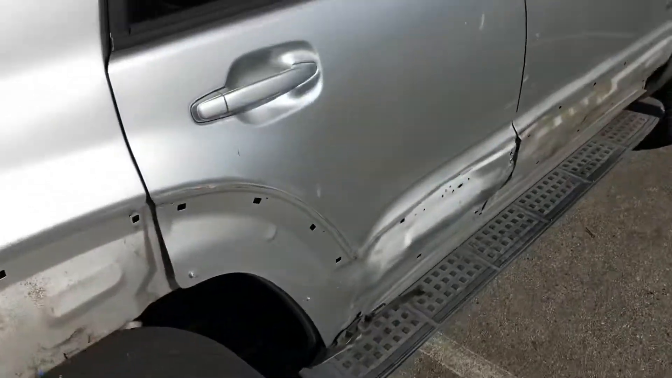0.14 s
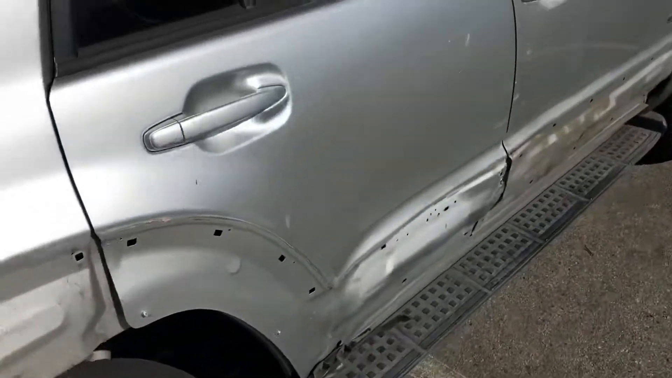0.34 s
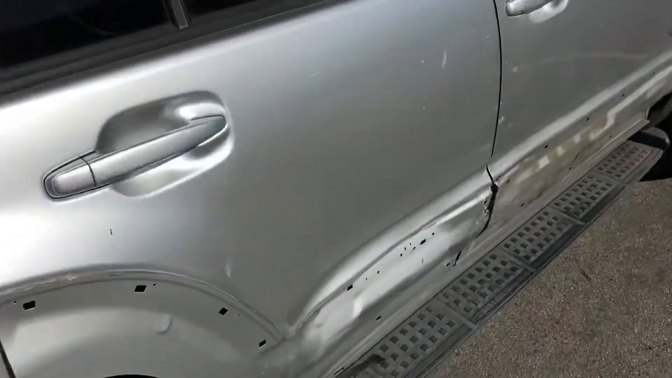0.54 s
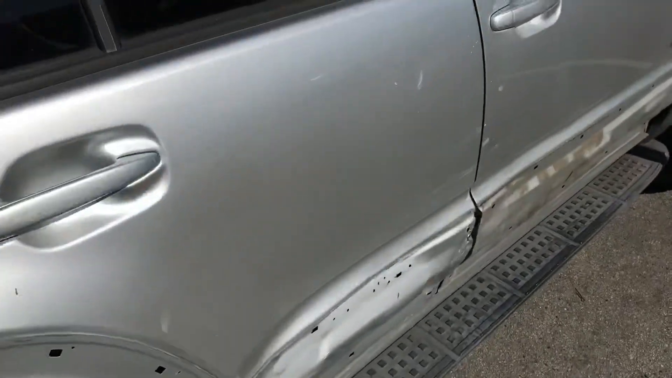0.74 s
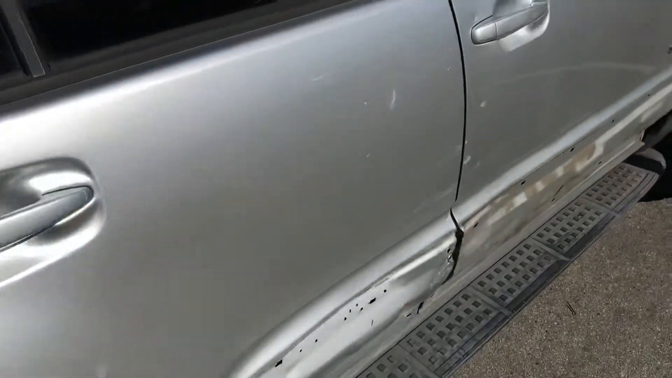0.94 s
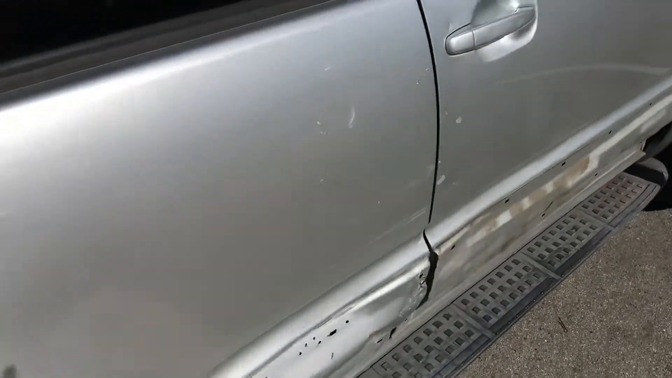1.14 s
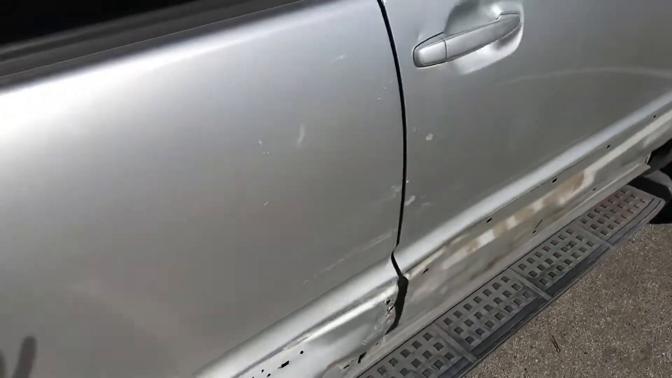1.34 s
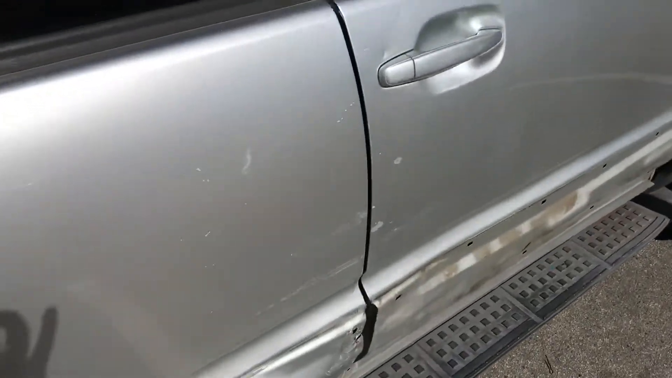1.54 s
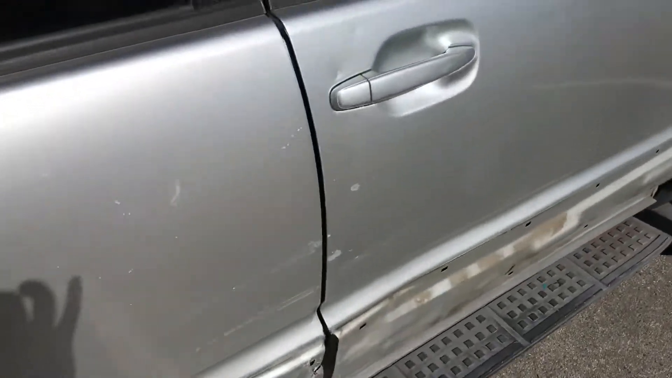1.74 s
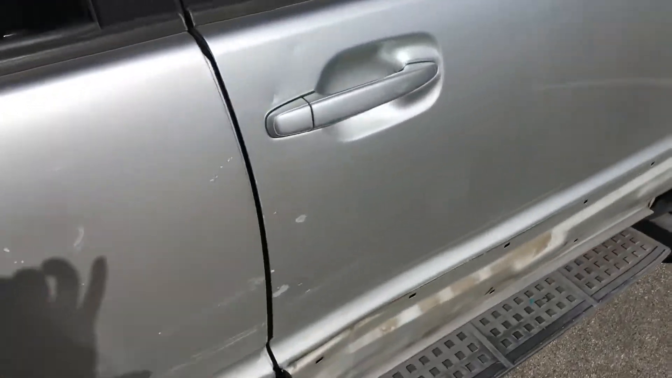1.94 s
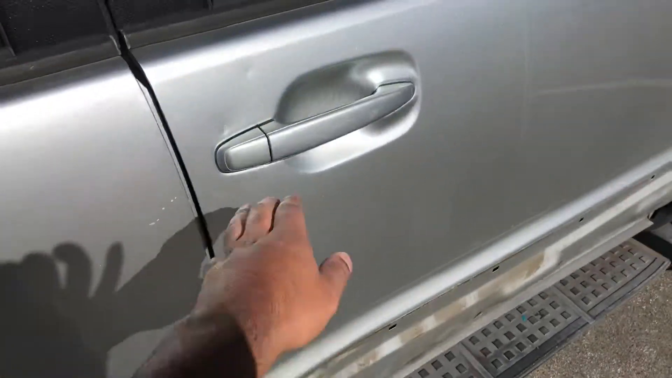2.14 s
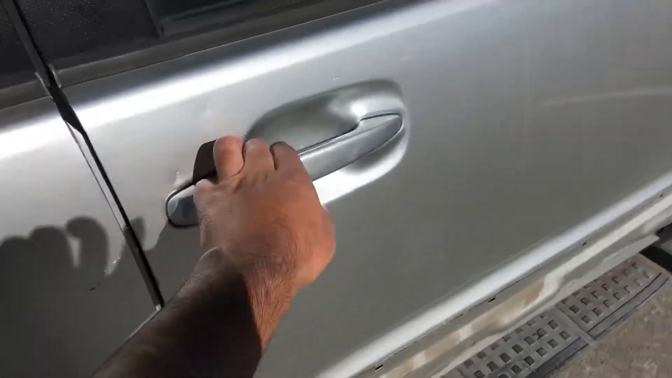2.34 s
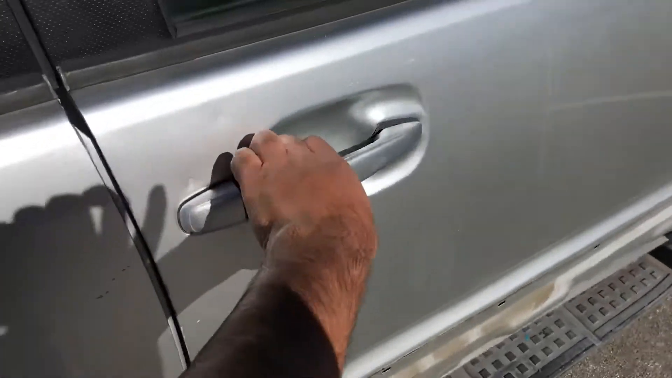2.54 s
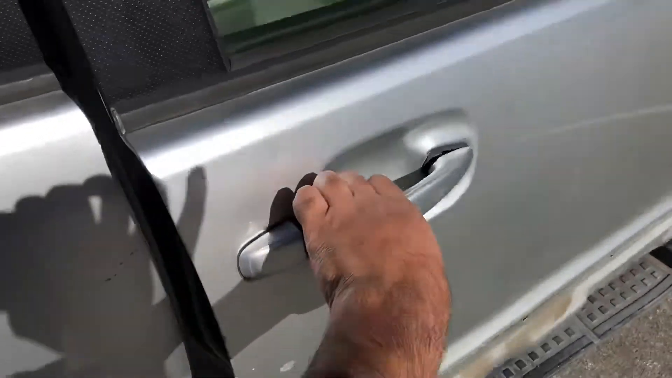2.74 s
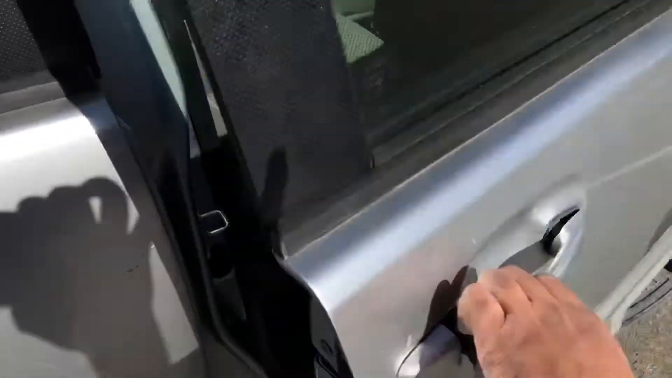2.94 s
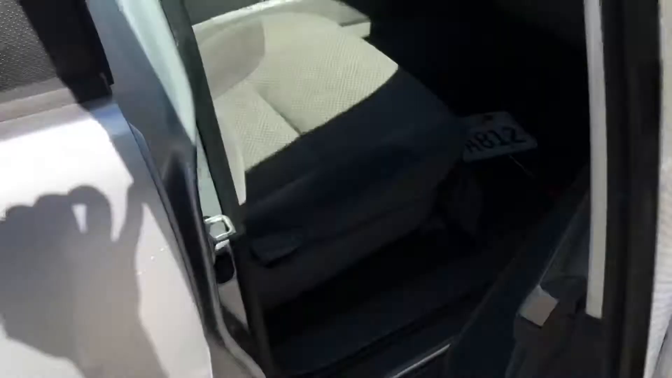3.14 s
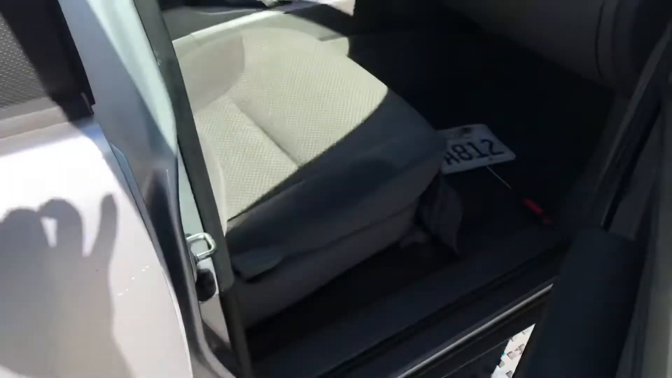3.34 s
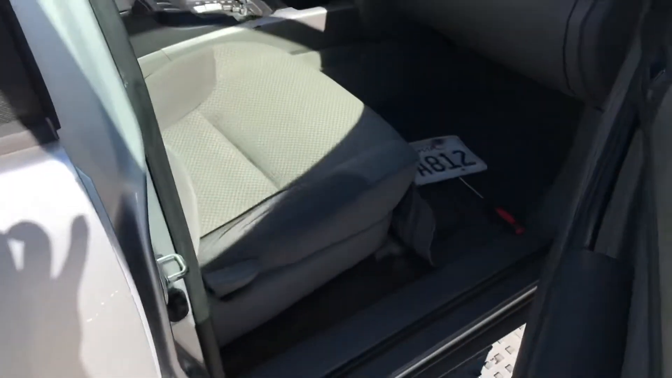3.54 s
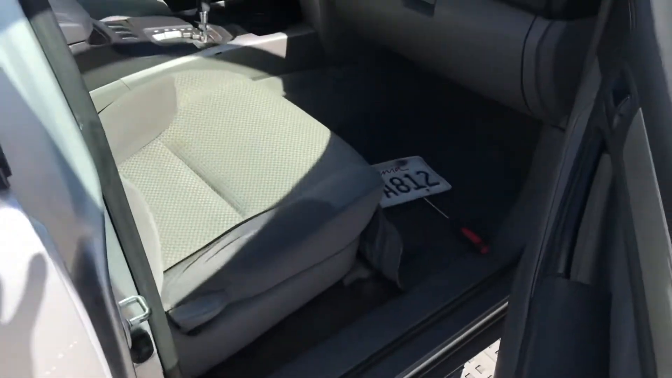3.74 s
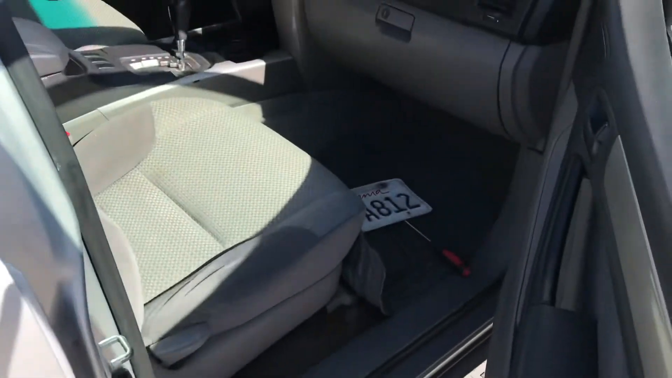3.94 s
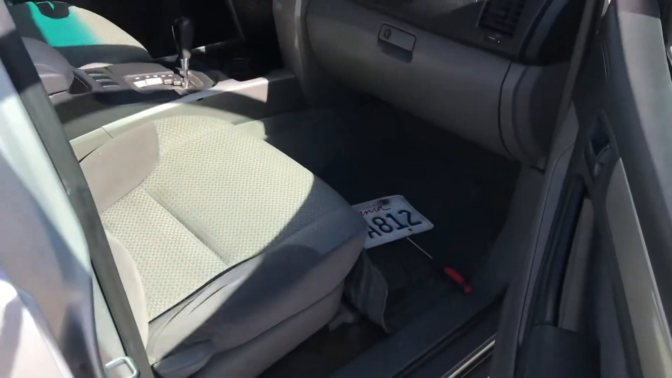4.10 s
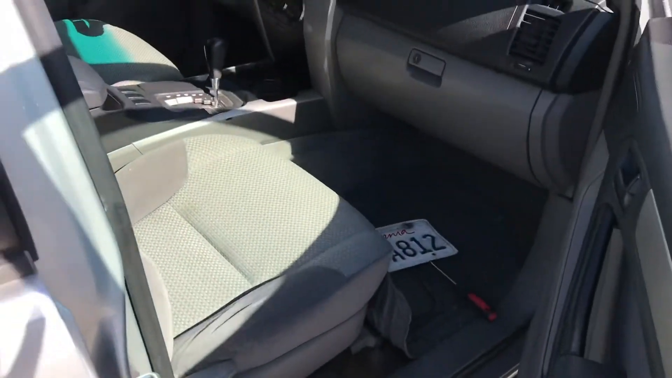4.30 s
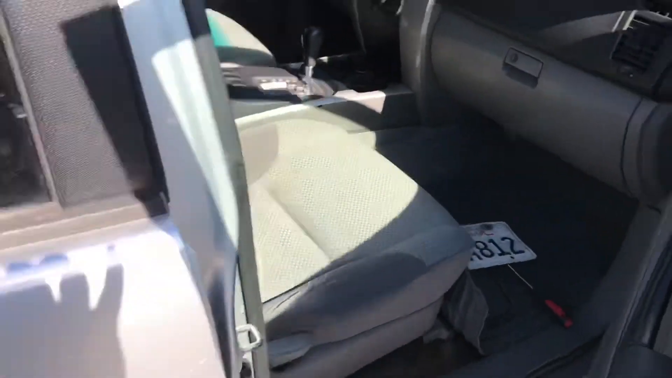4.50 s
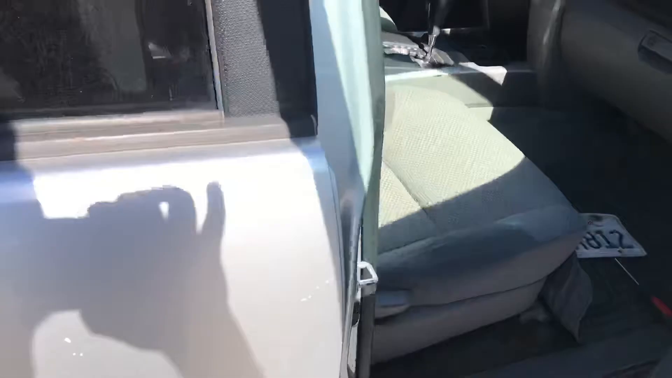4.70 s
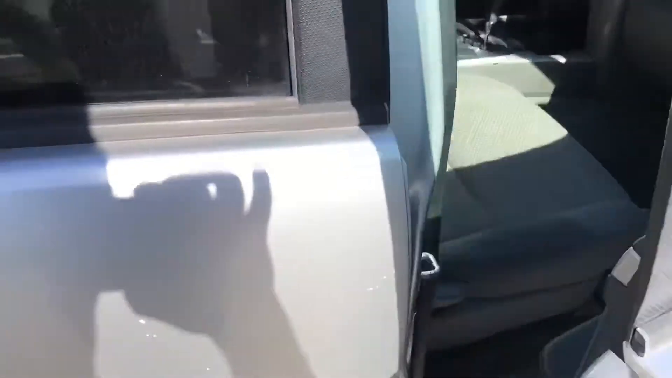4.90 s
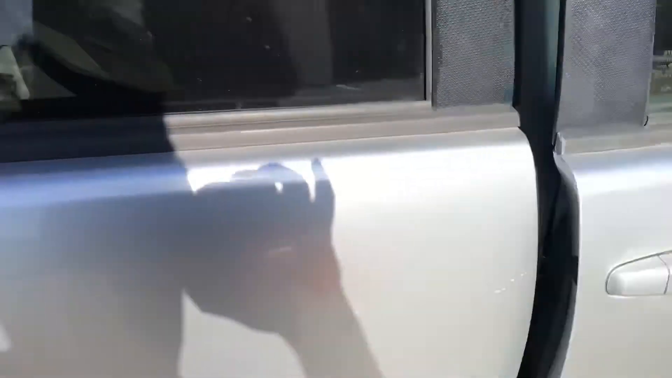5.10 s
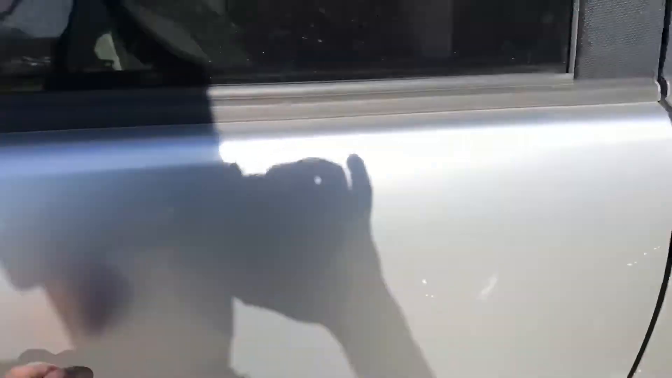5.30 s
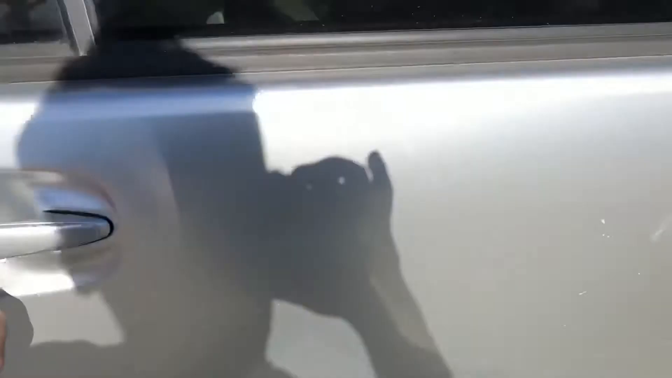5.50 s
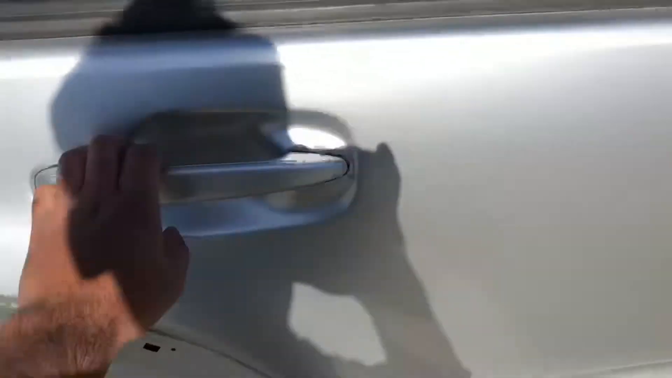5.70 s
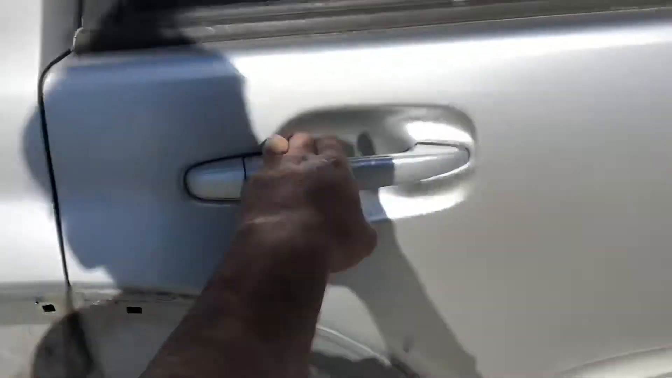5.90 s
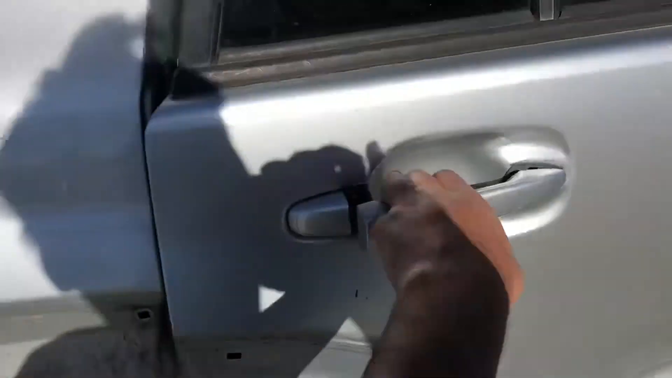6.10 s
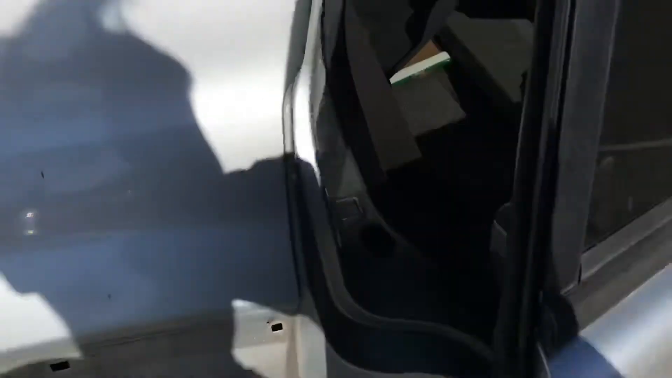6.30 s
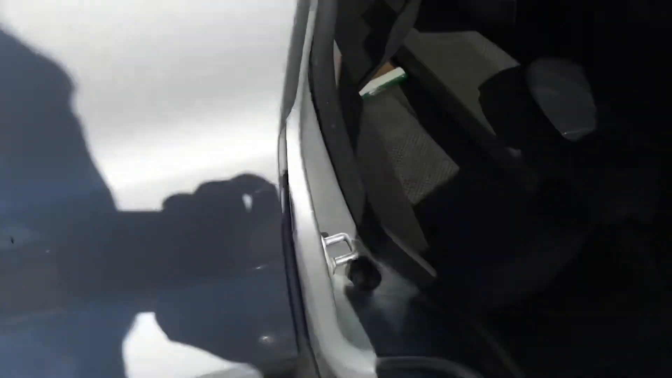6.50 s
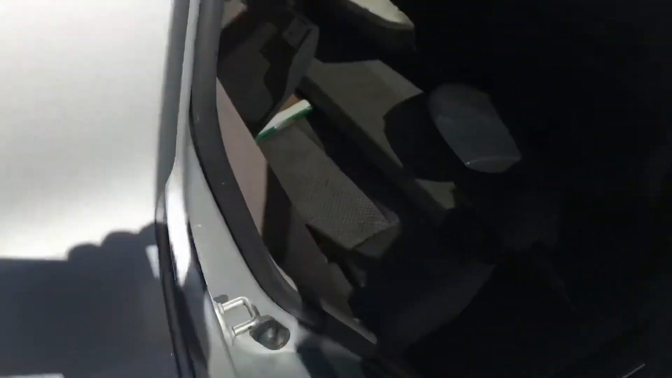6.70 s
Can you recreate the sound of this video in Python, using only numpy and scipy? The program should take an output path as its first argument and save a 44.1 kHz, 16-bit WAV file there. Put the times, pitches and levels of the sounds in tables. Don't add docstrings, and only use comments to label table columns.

```python
import sys
import numpy as np
from scipy import signal
from scipy.fft import rfft, irfft, next_fast_len
from scipy.io import wavfile
from scipy.ndimage import uniform_filter1d, map_coordinates

SR = 44100
rng = np.random.default_rng(int(sys.argv[2]) if len(sys.argv) > 2 else 0)


def invert_db(level):
    return 10 ** (np.asarray(level, dtype=float) / 20)


def master(y):
    cut = np.clip(np.atleast_2d(y).T, -1, 1)
    pcm = np.round(cut * 32767)
    wavfile.write(sys.argv[1], SR, pcm.astype(np.int16))


N = 297675

# start_s, level_db
TRAFFIC_NEARNESS = [(0, 1.5), (.6, 1.5), (1.5, .5), (1.9, -.5), (2.29, -1), (3.42, -2.5), (4.34, -2.5),
                    (4.83, -1), (5.15, -1), (5.5, 1.5), (5.7, 2), (5.9, 1), (6.17, 1), (6.39, -2.5),
                    (6.75, -0.5)]
# start_s, level_db
STIRRED_AIR = [(0, -1.5), (.6, -1.5), (2.29, -2), (2.71, 11), (2.8, 5.5), (3.16, 3), (3.42, 1), (4.34, 0.5),
               (4.83, 2), (5.13, 1.5), (5.45, 6), (5.7, 4), (5.96, 7), (6.17, 1.5), (6.39, 5.5), (6.64, 4),
               (6.75, 2)]
# pitch_hz, level_db (per Hz)
RUMBLE_COLOUR = [(12, -59), (20, -7), (36, -13), (49, 3.5), (97, 0.5), (119, -4), (135, -2), (180, -42),
                 (300, -120)]
DRONE_COLOUR = [(79, -36), (135, -1), (279, -3), (322, -6.5), (357, -11), (388, -11), (420, -13),
                (480, -17), (620, -18), (1060, -120)]
ROAD_COLOUR = [(240, -57), (400, 5), (422, -6), (515, -10.5), (650, 3), (754, 4), (821, 3), (903, 3.5),
               (1160, 4.5), (1510, 1), (1650, -1), (2360, -6.5), (2740, -7), (3570, -7.5), (5000, -31),
               (6500, -54), (11000, -120)]
AIR_COLOUR = [(2350, -21), (4000, -0.5), (4460, -2.5), (5070, -7), (6460, -4.5), (7770, -10.5),
              (8720, -6.5), (10400, -13.5), (11300, -10.5), (14700, -12), (15900, -13)]
# pitch_hz, width_hz, level_db
MACHINERY = [(61, 5.5, -6.5), (363.5, 9, -10), (660, 10.4, -17), (1143.4, 29, -13.5), (1300, 59, -21)]
# start_s, pitch_hz, level_db
IDLING_ENGINE = [(0, 60.6, -48), (.45, 57.2, -50), (.6, 57.4, -58), (.8, 58.8, -53), (.92, 59.5, -67),
                 (1.05, 58.8, -55), (1.35, 52.3, -53)]
# start_s, pitch_hz, level_db
LEAVING_ENGINE = [(1.45, 52, -54), (1.7, 73.1, -53), (1.85, 90.4, -53), (2, 95, -54), (2.1, 98, -58)]

# pitch_hz, level_db (per Hz)
RASP_COLOUR = [(1100, -12), (1900, 4), (3000, 4.5), (4500, 4), (7000, -5.5), (9500, -47)]
FIZZ_COLOUR = [(5000, -3), (7500, 2), (10500, -1.5), (13000, -1), (15800, -6)]
# start_s, length_s, first_db, last_db, fizz_minus_rasp_db
SKIN_SLIDES = [(2.061, 0.054, -57, -55.5, -2.5), (2.534, 0.079, -48, -53.5, -4.5),
               (2.612, 0.037, -47, -51.5, -1.5), (2.845, 0.13, -58, -59.5, -10), (3.53, 0.4, -69.5, -78, 2),
               (6.435, 0.062, -57.5, -34.5, -6), (6.664, 0.11, -51.5, -56.5, -1.5),
               (6.395, 0.037, -64, -56, -7), (6.51, 0.038, -43, -46, -6), (6.57, 0.1, -74, -54, -1.5),
               (5.276, 0.026, -32, -34, -17), (5.3, 0.028, -39, -55, -13), (5.92, 0.03, -72, -74, 7),
               (3.02, .1, -60, -56, -6), (3.145, .04, -62, -60, -2), (2.37, .07, -62, -66, -12),
               (4.89, .06, -56, -66, -12), (5.51, .06, -60, -64, -4), (5.65, .05, -63, -65, -2)]
# start_s, length_s, first_db, last_db, fizz_minus_rasp_db
SEAL_PEELS = [
    (3.01, 0.2, -58, -66.5, -6.5),
    (4.94, .14, -71, -62, -1),
    (5.06, 0.2, -64.5, -66, -20),
    (6.005, 0.077, -59.5, -36, -5),
    (6.072, 0.11, -55.5, -44, -8),
    (6.3, 0.3, -65, -56, -1.5),
]

# start_s, click_db, centre_hz
PLASTIC_TICKS = [(1.478, -48.5, 1720), (2.0954, -39, 2220), (2.3065, -43.5, 4040), (2.4932, -36, 2740),
                 (2.608, -45, 7020), (2.462, -55, 3000), (2.6588, -35, 2340), (2.734, -53, 3100),
                 (3.0854, -41, 1300), (3.108, -48, 4380), (3.17, -54, 4400), (4.835, -57, 5670),
                 (4.892, -44, 3320), (5.242, -31.5, 2380), (5.296, -27.5, 3980), (5.3084, -38, 4500),
                 (5.5567, -46, 4070), (5.9035, -48, 7000), (5.917, -49, 2300), (6.094, -32, 2510),
                 (6.111, -38, 4960), (6.1194, -49, 3140), (6.147, -33, 3420), (6.403, -50, 2980),
                 (6.7054, -46, 6280)]
# start_s, click_db, centre_hz, sheen_minus_click_db
STEEL_CLINKS = [(0.5662, -43.5, 1800, 4), (1.592, -50, 3630, 10), (2.3213, -43, 3200, 4),
                (2.3318, -42, 4230, 6), (2.362, -48, 3980, 6), (2.389, -51, 5000, 4),
                (2.4877, -38.5, 2460, 3), (5.5214, -48, 2410, 9), (5.536, -47, 2390, 12.5),
                (5.66, -44, 5500, 0), (5.682, -52, 3170, 13), (5.87, -52, 6500, 9),
                (6.4208, -39.5, 3440, -2), (6.4697, -32.5, 4610, -1), (6.533, -29.5, 4000, 7),
                (6.559, -31.5, 7000, -3), (6.689, -33.5, 3800, -6), (4.888, -54, 4000, 3),
                (5.8925, -53, 6500, 0), (5.914, -48, 6000, 2), (5.797, -57, 7000, 0), (6.403, -55, 5000, 6),
                (6.123, -41, 6500, -2), (6.096, -34, 5500, 0)]
# start_s, click_db, centre_hz, sheen_minus_click_db, t60_s (time to fall 60 dB)
PAWL_CLICKS = [(2.546, -38.5, 4330, 9, 0.044), (2.574, -33, 3450, 5, 0.064), (2.611, -41, 5000, 5, 0.072),
               (2.68, -32.5, 2620, -1.5, 0.038), (2.748, -31.5, 2700, -27, 0.049),
               (5.2604, -24, 3400, -19, 0.14), (5.285, -27, 4200, -19, 0.05), (5.342, -45, 3500, 2, 0.057),
               (6.031, -33, 3000, 9, 0.022), (6.047, -32, 3600, -12, 0.027)]

# pitch_hz, width_hz, level_db
HANDLE_TONES = [(513, 480, -2), (868, 360, 0), (1147, 220, -1), (1590, 277, -3), (1950, 650, -9)]
# pitch_hz, level_db
PANEL_TONES = [(205, -1), (258, 1.5), (300, 0.5), (345, 1.5), (385, -8), (440, -4.5)]
# start_s, rap_db, rap_centre_hz, knock_db
FINGER_TAPS = [
    (2.3075, -32, 668, -39),
    (2.3318, -31.5, 600, -30),
    (2.3632, -30, 905, -36),
]
# start_s, rap_db, rap_centre_hz, knock_db
DAMPED_RAPS = [(2.492, -19.5, 605, -35), (2.574, -25, 633, -33), (2.68, -28, 795, -20.5),
               (2.749, -27.5, 1870, -53), (2.888, -43, 452, -30.5), (2.927, -45, 571, -38),
               (3.015, -40, 563, -60), (3.085, -35, 900, -38), (5.523, -35.5, 696, -27.5),
               (5.558, -38, 450, -33), (5.908, -52, 452, -35), (6.147, -37, 975, -50),
               (6.445, -52, 657, -52)]
# start_s, rap_db, rap_centre_hz, knock_db
SWINGING_RAPS = [(2.839, -33, 700, -29), (4.886, -25.5, 440, -30), (4.91, -41, 458, -29.5),
                 (5.297, -20, 452, -19), (6.093, -33, 452, -21), (6.328, -35.5, 530, -35),
                 (6.409, -35, 1630, -34), (6.532, -24, 452, -22)]
# start_s, rap_db, rap_centre_hz, knock_db
PAWL_KNOCKS = [
    (5.243, -11.5, 780, -28),
    (5.261, -18, 1090, -16.5),
    (6.031, -19.5, 1550, -26.5),
]

# start_s, peak_db, pitch_hz, cycles
HAND_BUMPS = [(2.196, -34, 78.5, 1.8), (2.843, -36, 169.4, 13), (2.92, -36, 78, 4.6),
              (2.875, -37.5, 249.5, 18), (2.925, -39, 248.6, 16), (2.95, -41, 189, 10),
              (5.849, -51, 382, 20), (5.108, -62.5, 4620, 250), (2.715, -30, 270, 9), (2.84, -38, 370, 16),
              (4.9, -38, 400, 24), (6.105, -27, 335, 22), (6.085, -18, 238, 7), (3.804, -36, 79, 1.8),
              (4.604, -34.5, 62, 5.7), (4.664, -29.5, 106, 1.4), (5.41, -29.5, 56.6, 3.3),
              (5.711, -33.5, 122, 1.7), (5.9, -34, 86.1, 2.8), (5.916, -31, 76.4, 2.2)]
# start_s, peak_db, pitch_hz, cycles
AIR_PUNCHES = [(2.651, -23.5, 147, 6.4), (2.675, -34.5, 868, 32), (2.66, -32, 45, 3), (2.699, -28, 90.5, 3),
               (2.735, -37, 58, 3.2), (5.272, -8, 310, 2.5), (5.273, -13.5, 95, 2.9),
               (5.271, -34, 39.5, 2.7), (5.298, -21, 118, 4.8), (5.3192, -17.5, 63, 2.4),
               (5.369, -29, 102, 3.6), (6.0714, -5.5, 293, 2.74), (6.096, -24.5, 172, 7.5),
               (6.135, -35, 149.6, 7.3), (6.5014, -6, 444, 2.4), (6.51, -19.5, 154, 9.7),
               (6.56, -38, 136, 6)]

# pitch_hz, level_db (per Hz)
PUFF_COLOUR = [(5000, -7), (9000, -10), (12000, -2), (15800, -4)]
# pitch_hz, width_hz, level_db
STRAP_TONES = [(3630, 350, -1.5), (6160, 440, -3), (8650, 580, -5), (11900, 760, -5), (14200, 600, -7)]
# start_s, level_db
STRAP_CHATTER = [(6.668, -30), (6.684, -52), (6.691, -31), (6.704, -31), (6.713, -37), (6.741, -44),
                 (6.747, -27)]

# start_s, crack_db, rap_db, boom_db, rise_s
HEAVY_BLOWS = [
    (2.6517, -33, -22.5, -23.5, 0.004),
    (5.27, -16, -17, -19.5, 0.0016),
    (6.0701, -6, -12.5, -20, 0.012),
    (6.5015, 0.4, -16, -19, 0.014),
]
# pitch_hz, level_db, t60_s
PLATE_TONES = [
    [(635, 5, 0.17), (865, -6, 0.19), (1155, 5, 0.079), (1360, -21, 0.21), (1470, -7, 0.081),
     (1674, -20, 0.16), (1930, -19, 0.1), (2230, -23, 0.14), (2299, -18, 0.14)],
    [(452, 0, 0.13), (511, -21, 0.54), (565, -15, 0.21), (969, -25, 0.24), (1235, -8, 0.12),
     (1437, -20, 0.18), (1486, -8, 0.16), (1680, -26, 0.24), (1800, -26, 0.23), (1980, -29, 0.21),
     (2240, -21, 0.19), (2400, -20, 0.15)],
    [(625, -11, 0.18), (737, 5, 0.11), (873, -1, 0.2), (1010, -14.5, 0.35), (1143, -2, 0.16),
     (1293, -15, 0.3), (1775, 3, 0.11), (1956, -4, 0.044), (2270, -16, 0.13), (2340, -13, 0.099),
     (2450, -22, 0.15), (2520, -23, 0.18)],
    [(630, -12, 0.2), (700, -11, 0.15), (802, -1, 0.16), (1046, -12, 0.16), (1233, -2, 0.076),
     (1320, -17, 0.16), (1491, -8, 0.19), (1750, -5, 0.13), (1940, -16, 0.098), (2143, -10, 0.11),
     (2330, -15, 0.19), (2880, -14, 0.15)],
]
PLATE_LEVELS = [-23, -17, -14, -21]
# pitch_hz, level_db, t60_s
DOOR_TONES = [
    [(91, -19, 0.16), (158.7, -2.5, 0.39), (213.3, -3, 0.35), (246, -5, 0.3), (310, -3, 0.2),
     (371, -3, 0.22), (432, 0, 0.12), (593, -6, 0.1), (851, -12, 0.25)],
    [(60.4, -8, 0.57), (95, -9, 0.56), (130, -13, 0.3), (165, -6.5, 0.37), (251.2, 6.5, 0.16),
     (302.5, -5, 0.22), (353, -3, 0.27), (432, -26, 0.072), (590, -12, 0.084)],
    [(134, -19, 0.26), (176, -13.5, 0.56), (241, 0, 0.12), (332.5, 2, 0.19), (369, 8.5, 0.13),
     (435, 3.5, 0.11), (560, -21, 0.15), (790, -34, .1), (1150, -30, 0.1)],
    [(122, -21, 0.53), (155.4, -2, 0.3), (271, 7.5, 0.06), (322.6, -7, 0.21), (360, -13, 0.19),
     (394.5, 7, 0.11), (465, -6, 0.03), (765, -20, 0.083), (1010, -25, 0.21)],
]
# rattle_minus_crack_db, rattle_stretch (times), rap_stretch (times)
TRIM_SHAKES = [
    (-3.5, 2.3, 1.2),
    (3, 0.72, 0.75),
    (-19, 1.7, 0.68),
    (-11, 1.02, 0.82),
]
# pitch_hz, level_db (per Hz)
CRACK_COLOUR = [(1060, 13), (1800, -8), (2290, -1), (3000, -3.5), (3570, 6), (4070, 1), (6010, 5.5),
                (6710, -2), (8080, -19), (9370, -7), (10100, -19), (14900, -8), (16500, -50)]
# pitch_hz, t60_s
RATTLE_DECAY = [(400, 0.2), (1000, 0.11), (2500, 0.096), (6000, 0.058), (14000, 0.05)]


def unit(x):
    return x / np.sqrt(np.mean(x ** 2) + 1e-20)


def peak(x):
    return x / np.abs(x).max()


def along(points, hz):
    f, db = np.transpose(points)
    return invert_db(np.interp(np.log(hz + 1), np.log(f + 1), db, -120, -120))


def curves(rows):
    s, *columns = np.transpose(rows)
    return [np.interp(np.arange(N) / SR, s, column) for column in columns]


def wobble(rate):
    knots = rng.standard_normal(int(N * rate / SR) + 4)
    return map_coordinates(knots, [np.arange(N) * rate / SR])


def noise(length=N):
    return rng.standard_normal(length)


def filtered(x, response):
    m = next_fast_len(len(x) + 8192)
    return irfft(rfft(x, m) * response(np.fft.rfftfreq(m, 1 / SR)), m)[:len(x)]


def resonances(modes):
    def response(f):
        total = 0
        for k, (centre, width, db) in enumerate(modes):
            total = total + (-1) ** k * invert_db(db) * 1j * f * width / (centre ** 2 - f ** 2 + 1j * f * width)
        return total
    return response


def rush(colour, patchy_db):
    z = signal.stft(noise(N + 512), nperseg=512)[2]
    patches = uniform_filter1d(rng.standard_normal(z.shape), size=6, axis=0)
    patches = uniform_filter1d(patches, size=14, axis=1)
    x = signal.istft(z * invert_db(patchy_db * unit(patches)), nperseg=512)[1][:N]
    return unit(filtered(x, lambda hz: along(colour, hz)))


def burst(response, t60, rise):
    t = np.arange(SR // 4) / SR
    shape = invert_db(-60 * t / max(t60, 1e-3)) * (1 - np.exp(-t / max(rise, 1e-5)))
    return peak(shape * filtered(noise(len(t)), response))


def ring(modes, scatter_db, rise):
    t = np.arange(SR // 2)[:, None] / SR
    hz, db, t60 = np.transpose(modes)
    detune, strength = rng.standard_normal((2, len(hz)))
    pair = np.sin(2 * np.pi * hz * t)
    pair = pair + 0.4 * np.sin(2 * np.pi * hz * (1 + 0.04 * detune) * t)
    dying = invert_db(db + scatter_db * strength - 60 * t / np.clip(t60, 0.03, 0.5))
    return peak((pair * dying).sum(axis=1) * (1 - np.exp(-t[:, 0] / max(rise, 1e-5))))


def rattle(response, stretch):
    hz, t, z = signal.stft(noise(SR // 2), SR, nperseg=128)
    f, t60 = np.transpose(RATTLE_DECAY)
    decay_s = stretch * np.interp(hz, f, t60)
    x = signal.istft(z * invert_db(-60 * t / decay_s[:, None]), SR, nperseg=128)[1]
    return peak(filtered(x, response))


def add(track, s, x):
    part = track[round(s * SR):][:len(x)]
    part += x[:len(part)]


def rumble():
    (near_db,), (sway_db,) = curves(TRAFFIC_NEARNESS), curves(STIRRED_AIR)
    low_db = -47.5 + 0.88 * sway_db + 0.33 * wobble(9)
    drone_db = -51.5 + 1.08 * sway_db + 0.27 * near_db + 1.05 * wobble(7.5)
    low = invert_db(low_db) * rush(RUMBLE_COLOUR, patchy_db=1.8)
    return low + invert_db(drone_db) * rush(DRONE_COLOUR, patchy_db=-0.6)


def machinery():
    near_db, = curves(TRAFFIC_NEARNESS)
    hum = np.zeros(N)
    for mode in MACHINERY:
        level = invert_db(mode[2] + 2.4 * wobble(1.67))
        hum += level * unit(filtered(noise(), lambda f: resonances([mode])(f) ** 2))
    return invert_db(-55 + 0.26 * near_db) * hum


def tyres():
    near_db, = curves(TRAFFIC_NEARNESS)
    road = invert_db(-58 + near_db + 0.4 * wobble(5)) * rush(ROAD_COLOUR, patchy_db=1.1)
    tread = resonances([(3000, 1500, 0)])
    road = road + invert_db(-8 + 1.2 * near_db) * filtered(road, lambda f: np.abs(tread(f)))
    return road + invert_db(-65.5 + near_db + 0.4 * wobble(7)) * rush(AIR_COLOUR, patchy_db=0.8)


def engines():
    out, t = np.zeros(N), np.arange(N) / SR
    fade_s = 0.11
    for rows in IDLING_ENGINE, LEAVING_ENGINE:
        hz, db = curves(rows)
        inside_s = np.minimum(t - rows[0][0], rows[-1][0] - t)
        fade = np.clip(1 + inside_s / fade_s, 0, 1)
        level = invert_db(db + 4.5 + 0.71 * wobble(8))
        out += fade * level * np.sin(2 * np.pi * np.cumsum(hz) / SR)
    return out


def rubs():
    t = np.arange(N) / SR
    rasp, fizz, body = np.zeros((3, N))
    # strokes, how strongly they sound the handle (dB), onset (s), release (s)
    kinds = [(SKIN_SLIDES, -2, 0.0053, 0.0031), (SEAL_PEELS, 8.5, 0.02, 0.027)]
    for strokes, body_db, grip_s, lift_s in kinds:
        for s, length, first_db, last_db, fizz_db in strokes:
            on = np.clip(np.minimum((t - s) / grip_s, (s + length - t) / lift_s), 0, 1)
            level = on * invert_db(np.interp(t, [s, s + length], [first_db, last_db]))
            rasp += level
            fizz += level * invert_db(fizz_db)
            body += level * invert_db(body_db)
    clumps = unit(invert_db(0.7 * wobble(120) + 1.6 * wobble(500)))
    handle = unit(filtered(noise(), resonances(HANDLE_TONES)))
    rough = rasp * rush(RASP_COLOUR, patchy_db=2.5)
    bright = fizz * rush(FIZZ_COLOUR, patchy_db=1.5)
    return clumps * (rough + bright + body * handle)


def clicks():
    out = np.zeros(N)
    plastic = [(*row, -17, 0.032) for row in PLASTIC_TICKS]
    steel = [(*row, 0.013) for row in STEEL_CLINKS]
    for s, click_db, hz, sheen_db, t60 in plastic + steel + PAWL_CLICKS:
        body = resonances([(hz, 0.75 * hz, 0), (1.074 * hz, 0.067 * hz, -3)])
        click = burst(lambda f: body(f) ** 2, t60, rise=0.00059)
        sheen = burst(lambda f: along(FIZZ_COLOUR, f), 1.7 * t60, rise=0.00036)
        add(out, s, invert_db(click_db + 2.5) * click)
        add(out, s, invert_db(click_db + sheen_db - 8) * sheen)
    return out


def raps():
    out = np.zeros(N)
    handle = resonances(HANDLE_TONES)
    # hits, rap t60 (s), knock t60 (s)
    kinds = [(FINGER_TAPS, 0.05, 0.12), (DAMPED_RAPS, 0.12, 0.093),
             (SWINGING_RAPS, 0.22, 0.25), (PAWL_KNOCKS, 0.064, 0.28)]
    for hits, rap_t60, knock_t60 in kinds:
        panel = [(*tone, knock_t60) for tone in PANEL_TONES]
        for s, rap_db, rap_hz, knock_db in hits:
            spot = resonances([(rap_hz, 0.8 * rap_hz, 0)])
            rap = burst(lambda f: handle(f) * spot(f), rap_t60, rise=0.00068)
            add(out, s, invert_db(rap_db - 4.5) * rap)
            add(out, s, invert_db(knock_db - 1.5) * ring(panel, scatter_db=3.5, rise=0.0015))
    return out


def bumps():
    out, t = np.zeros(N), np.arange(SR // 4) / SR
    for s, db, hz, cycles in HAND_BUMPS + AIR_PUNCHES:
        u = t * hz / max(cycles, 0.3)
        swell = u * np.exp(-4 * u)
        add(out, s, invert_db(db) * peak(swell * np.sin(2 * np.pi * hz * t)))
    return out


def seal_puff():
    start_s, length_s, level_db = 4.95, 0.12, -56
    t = np.arange(N) / SR
    swell = np.sin(np.pi * np.clip((t - start_s) / length_s, 0, 1)) ** 2
    return invert_db(level_db) * swell * unit(filtered(noise(), lambda f: along(PUFF_COLOUR, f)))


def check_strap():
    out = np.zeros(N)
    for s, db in STRAP_CHATTER:
        add(out, s, invert_db(db) * burst(resonances(STRAP_TONES), t60=0.048, rise=0.0005))
    return out


def plates():
    out = np.zeros(N)
    for (s, *_), modes, db in zip(HEAVY_BLOWS, PLATE_TONES, PLATE_LEVELS):
        add(out, s + 0.00094, invert_db(db) * ring(modes, scatter_db=3.3, rise=0.00046))
    return out


def blows():
    out = np.zeros(N)
    steel = lambda f: along(CRACK_COLOUR, f)
    bright = lambda f: along(FIZZ_COLOUR, f)
    for blow, door, shake in zip(HEAVY_BLOWS, DOOR_TONES, TRIM_SHAKES):
        s, crack_db, rap_db, boom_db, rise = blow
        rattle_db, rattle_stretch, rap_stretch = shake
        add(out, s, invert_db(crack_db - 3.5) * burst(steel, t60=0.016, rise=0.00043))
        add(out, s, invert_db(crack_db - 14) * burst(bright, t60=0.0067, rise=0.0002))
        add(out, s + 0.0011, invert_db(crack_db + rattle_db) * rattle(steel, rattle_stretch))
        add(out, s + 0.000803, invert_db(rap_db + 4) * rattle(resonances(HANDLE_TONES), rap_stretch))
        add(out, s, invert_db(boom_db + 8) * ring(door, scatter_db=-0.5, rise=rise))
    return out


def scene():
    background = rumble() + machinery() + tyres() + engines()
    handling = rubs() + clicks() + raps() + bumps()
    door = seal_puff() + check_strap() + plates() + blows()
    return (background + handling + door)[None]


def low_pass(x):
    return signal.sosfilt(signal.butter(12, 15900, fs=SR, output="sos"), x)


def record(dry):
    rounded = -dry / (1 + np.abs(dry / 0.93) ** 6) ** (1 / 6)
    return low_pass(rounded)


dry = scene()
out = record(dry)
master(out)
```